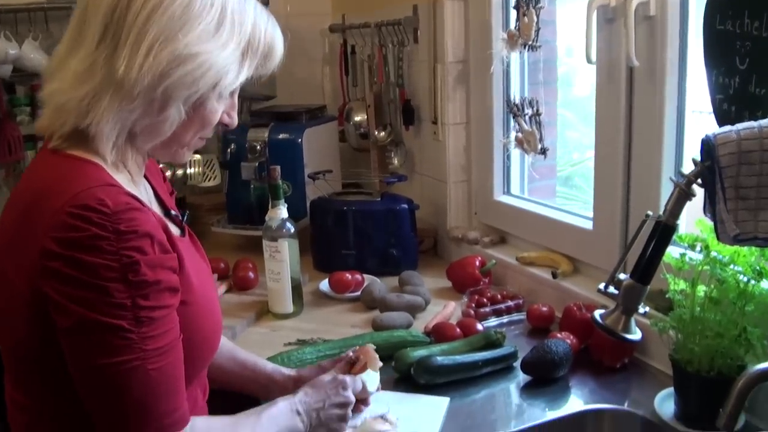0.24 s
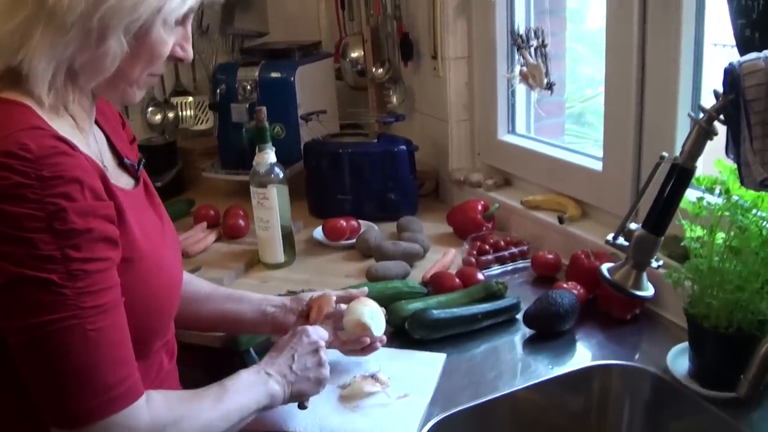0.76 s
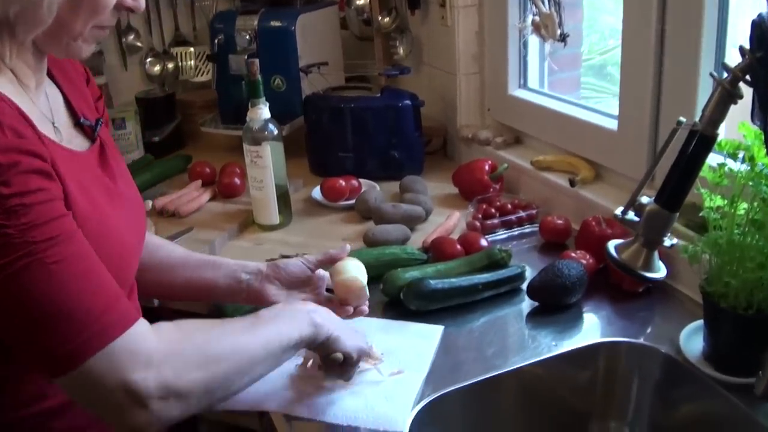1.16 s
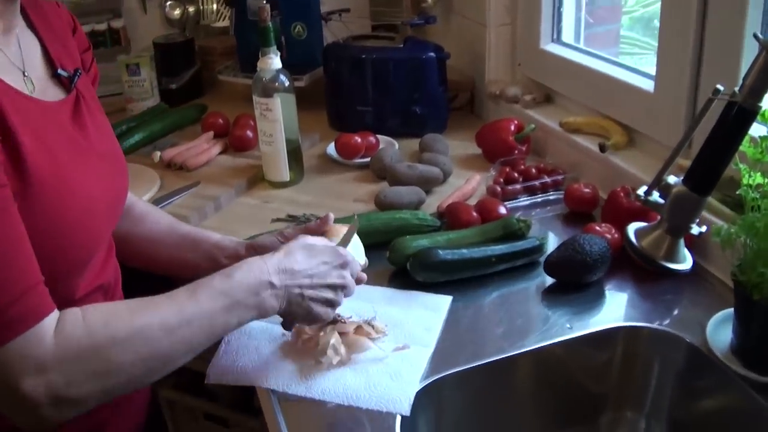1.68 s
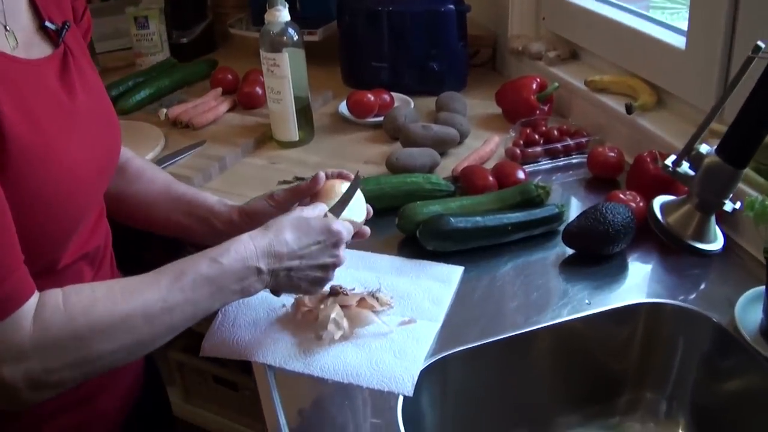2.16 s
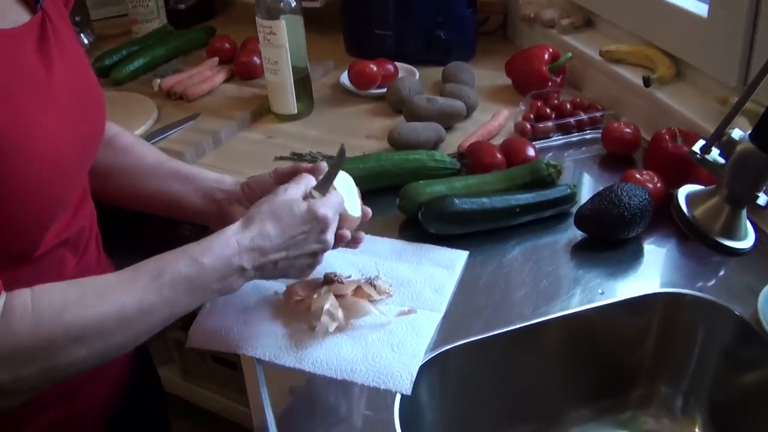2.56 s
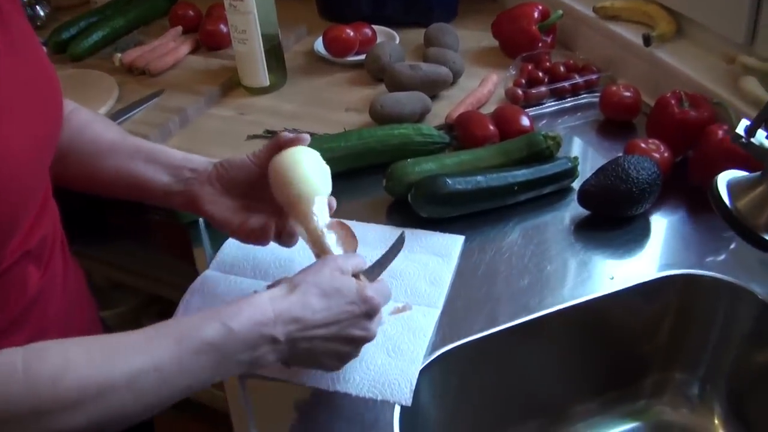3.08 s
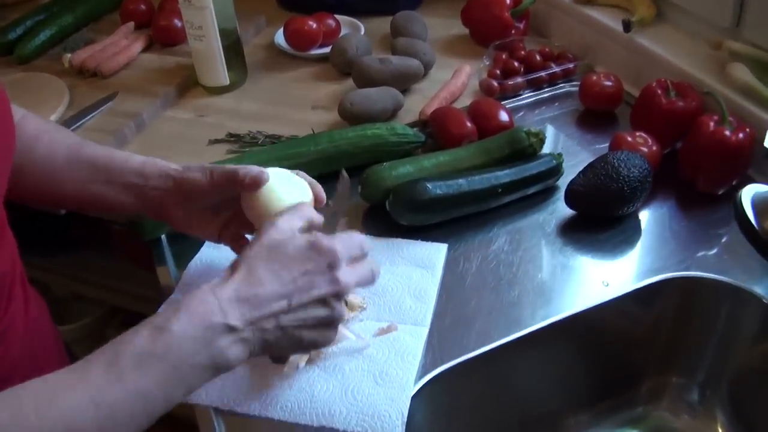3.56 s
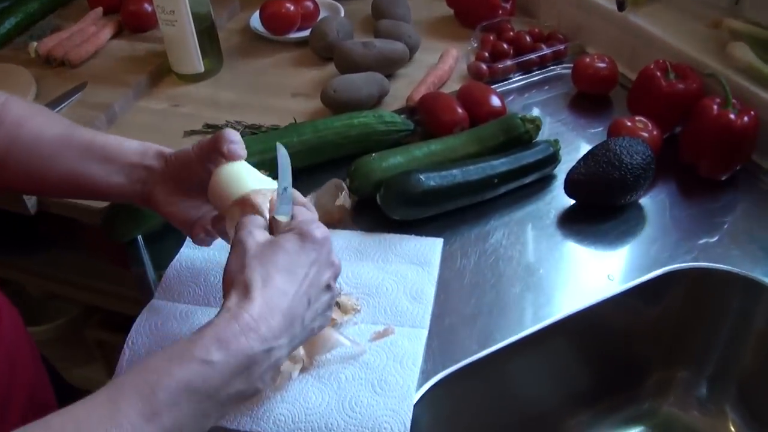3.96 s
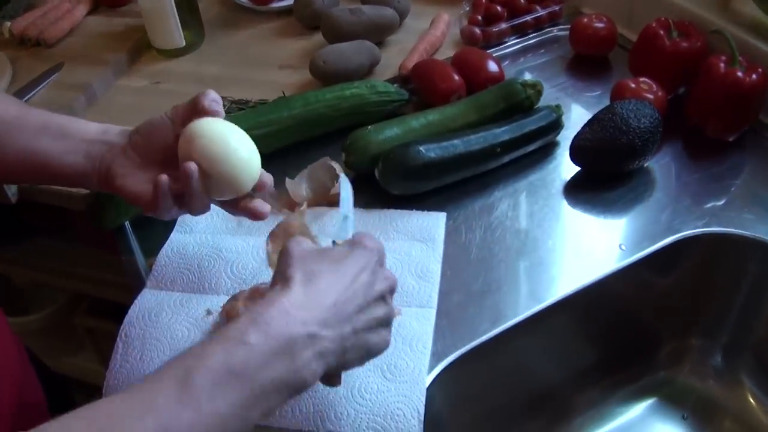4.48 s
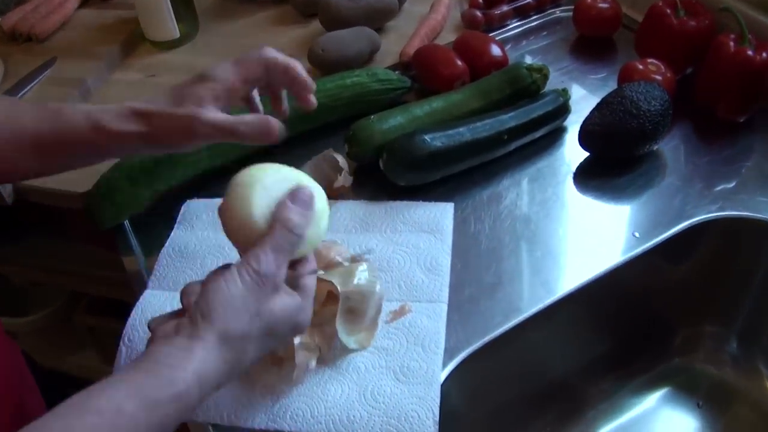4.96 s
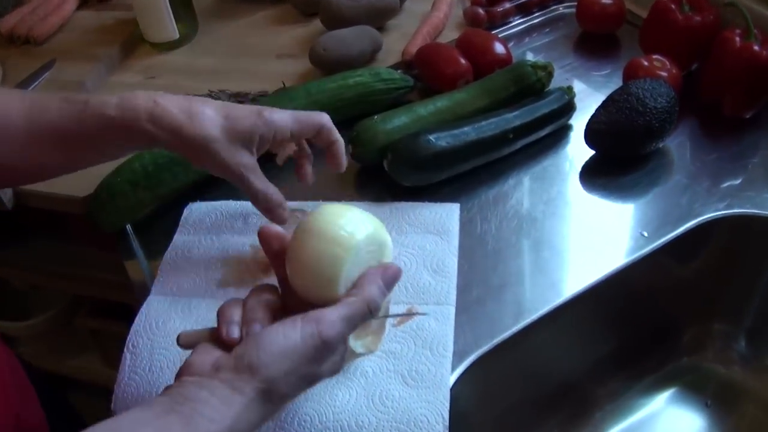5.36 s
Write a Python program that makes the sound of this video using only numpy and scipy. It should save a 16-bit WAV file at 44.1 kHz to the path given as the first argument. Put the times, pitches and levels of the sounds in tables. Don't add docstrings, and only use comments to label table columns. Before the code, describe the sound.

In a quiet small kitchen, one close microphone catches dry onion skin being peeled by hand and small knife. Dense snaps and papery rustling open, thin out to a near pause before two seconds, then return as brighter, longer rips. Sparse ticks and tugs follow; just after five seconds the onion bumps the counter dully and a last scrap rustles. Faint appliance hum and soft hiss lie beneath.

```python
import sys
import numpy as np
from scipy import signal
from scipy.fft import rfft, irfft
from scipy.io import wavfile
from scipy.ndimage import uniform_filter1d

SR = 44100
rng = np.random.default_rng(int(sys.argv[2]) if len(sys.argv) > 2 else 0)


def inscribe(sig):
    pcm = np.round(np.clip(np.atleast_2d(sig).T, -1, 1) * 32767)
    wavfile.write(sys.argv[1], SR, pcm.astype(np.int16))


def makeup_ratio(level_db):
    decades = np.asarray(level_db, float) / 20
    return 10 ** decades


N = 248091

# pitch_hz, density_db
ROOM_NOISE = [(12, -49), (20, -1.5), (54, -19), (103, -17), (196, -25), (266, -24), (333, -33), (811, -32),
              (1070, -36), (3450, -40), (4430, -42.5), (15500, -43)]
# pitch_hz, width_hz, level_db, start_s, end_s
APPLIANCE_HUM = [
    (264.6, 22, -67, -1.5, 1.57),
    (260, 54, -70.5, 3.5, 5.25),
    (500, 48, -68, 4, 5.15),
    (500, 77, -69.5, 0.3, 1.26),
    (717, 8.4, -86.5, 4.5, 7.1),
]
# pitch_hz, density_db
CHANNEL_HISS = [(12, -35), (20, 9.5), (282, -4.5), (416, -1.5), (667, -8.5), (15500, -6.5)]
# pitch_hz, t60_s
KITCHEN_DECAY = [(300, 0.11), (700, 0.24), (2000, 0.19), (6000, 0.052), (15000, 0.15)]
# delay_s, level_db
NEAR_ECHOES = [(.0036, -11.5), (.0071, -26), (0.01, -19), (0.017, -27)]
# start_s, blow_db
ONION_BLOWS = [
    (5.167, -27),
    (5.186, -32.5),
    (5.211, -31.5),
    (5.237, -37),
    (5.255, -38.5),
    (5.297, -44.5),
]
# pitch_hz, level_db, t60_s
COUNTER_MODES = [(102.6, -7, 0.17), (132, -0.5, 0.19), (183, 1, 0.17), (340, 0.5, 0.064), (419, 5, 0.077),
                 (462, -6.5, 0.25), (620, -5, 0.059), (775, -6.5, 0.069), (1160, -22, 0.061)]
# low_hz, high_hz, level_db
RUSTLE_BANDS = [
    (3260, 11900, -0.5),
    (7840, 17500, -1.5),
    (1280, 2426, 0.5),
    (470, 1130, -3),
]
# pitch_hz, width_hz, level_db over the rustle
SKIN_HOLLOWS = [(2150, 550, -8), (3300, 770, -1), (4520, 79, -3.5), (6400, 2500, -5.5)]
# start_s, end_s, pitch_hz, width_hz, lift (ratio, -1 shuts)
SKIN_CURLS = [(0.17, 0.237, 3660, 600, -0.2), (0.503, 0.575, 3200, 4600, -0.53),
              (1.224, 1.305, 2300, 500, 1), (2.198, 2.303, 2100, 500, 3), (2.2, 2.294, 5100, 900, 1.7),
              (2.204, 2.322, 6500, 3700, -1), (2.196, 2.3, 3240, 700, -0.3), (2.3, 2.35, 1800, 470, 3),
              (2.43, 2.534, 3020, 1400, -1.4), (2.46, 2.596, 4540, 630, 0.5),
              (2.665, 2.701, 12000, 3800, 2.4), (2.665, 2.7, 5200, 4500, -0.75),
              (2.756, 2.788, 2500, 580, 4.5), (2.967, 3.036, 2900, 620, 2.5), (3.228, 3.265, 3100, 350, 2),
              (3.377, 3.48, 2100, 330, 9), (3.354, 3.482, 3530, 400, 0.5), (3.34, 3.463, 8800, 3300, 0.3),
              (3.552, 3.713, 2320, 580, 1.7), (3.615, 3.698, 4500, 400, 0.5), (4.24, 4.398, 4400, 900, 0.8),
              (4.675, 4.708, 3600, 452, 7.5), (4.282, 4.4, 3100, 730, 0.5), (5.343, 5.385, 8700, 3600, 3),
              (5.338, 5.388, 3600, 3000, -3), (5.207, 5.295, 4300, 900, 0.1)]
# start_s, effort_db, fall_s per 20 dB, bright_db, body_db
HAND_JERKS = [(.003, -34.5, 0.1747, 2, -8), (.06, -41, 0.25, 3.5, -8), (.105, -43.5, 0.38, -7, -6),
              (.346, -39.5, 0.2163, 2, -10), (0.427, -44, 0.2342, 9, -3), (0.61, -36, 0.1934, 6, -7),
              (0.714, -46.5, 0.13, 2, -2), (0.978, -43.5, 0.15, 4, -13.5), (1.236, -49, 0.19, 3, -6),
              (2.207, -58, 0.6, 10, -8), (2.53, -49, 0.34, -10, -4), (2.313, -37.5, 0.09, 7, -11.5),
              (2.439, -48, 0.5, 8, -10), (2.548, -35, 0.43, -9, -10), (2.665, -38, 0.02, 17.5, -6),
              (2.744, -36, 0.068, 10.5, -13), (2.791, -35, 0.0726, 8, -5.5), (2.906, -39, 0.06, 6, 0),
              (2.917, -39, 0.03, 16.5, -13), (2.944, -31, 0.0548, 10, -3.5), (3.053, -65, 0.5, 3, -22),
              (3.227, -50.5, 0.21, 5, -15), (3.271, -44.5, 0.13, 7.5, -8.5), (3.34, -48, 0.07, 13.5, -18),
              (3.569, -53, 0.31, 4, -7), (4.239, -56.5, 0.18, 5, -13), (5.343, -52.5, 0.06, 5.5, -20.5),
              (5.56, -66.5, -1.5, 5.5, -6.5)]
# peak_s, effort_db, swell_s per 20 dB, bright_db, body_db
FINGER_SLIDES = [(0.195, -32.5, 0.085, 6.5, -10.5), (.29, -44.5, 0.2, -3, -4), (.5, -50, 0.27, -4, -1),
                 (.85, -57.5, 0.12, -11, -1.5), (1.085, -46, 0.1151, -14, -4.5), (1.32, -50.5, 0.32, 3, -7),
                 (2.708, -39.5, 0.19, 6.5, -9), (2.89, -47, 0.1862, 6, -2), (3.133, -45.5, 0.2136, 4.5, -6),
                 (3.669, -48, 0.08, 10, -8.5), (3.88, -59, 0.37, -11, -5), (4.0, -58.5, 0.33, 3, -12.5),
                 (4.325, -50.5, 0.1, 3.5, -8), (4.369, -44.5, 0.0821, 1, -2.5), (4.602, -47, 0.0767, 5, -7),
                 (4.85, -71, 1, -8, 1.5), (5.233, -45, 0.0639, 0.5, -9.5), (5.42, -59.5, 0.06, 3, -5.5)]
# start_s, peak_db, pitch_hz
PINPRICKS = [(.1986, -17, 8000), (.3237, -31, 7000), (.4535, -37, 2000), (2.2218, -40, 2000),
             (2.2272, -35, 5500), (2.2444, -44, 2000), (2.2652, -35, 5000), (2.3203, -30, 1860),
             (2.508, -33, 3300), (2.5718, -17, 4500), (2.9176, -16, 6000), (3.1256, -31, 6000),
             (3.1417, -26, 10100), (3.158, -30, 5000), (3.1636, -31, 8050), (4.2806, -37.5, 10000),
             (4.6882, -43, 3600), (2.495, -41, 1700), (2.432, -43, 1800), (5.5713, -44.5, 3700)]
# start_s, peak_db, pitch_hz, bright_db
SCATTERED_TICKS = [(1.3, -49, 1670, 0), (.889, -42, 3700, 3), (0.99, -20, 7000, -8), (3.2, -36, 9500, -3),
                   (1.4113, -34, 6700, -1), (4.3, -37, 4430, -10), (3.881, -37, 4300, -8),
                   (3.154, -32, 5200, 0), (4.8915, -55, 11500, -2), (4.9305, -49, 5000, -12),
                   (4.0735, -34.5, 4000, -5), (3.138, -25, 4500, -3), (4.2665, -36, 7200, 2.5),
                   (4.286, -39, 4300, -8), (4.3505, -29, 4200, -3), (4.3765, -25, 5500, -3),
                   (4.383, -32, 7000, -2), (4.391, -35, 1860, -2), (4.5785, -35.5, 2480, -7),
                   (3.1165, -34, 6200, 2), (2.5488, -22, 7100, -8), (.6035, -25.5, 9400, -3),
                   (0.0031, -17.5, 3600, -7)]
# start_s, peak_db, pitch_hz (ring), push_db (low), bright_db (crack)
CLEAN_TICKS = [(.0954, -18.5, 6130, -32, 3), (.2269, -13, 6000, -17, -15), (.2867, -12.5, 4900, -20, -8),
               (.3455, -14, 4760, -4.5, 0), (.4279, -15.5, 3690, -8, 0.5), (.4993, -21, 3570, -22, 5.5),
               (.5946, -13.5, 5500, -21, -25), (.6749, -22.5, 2100, -23, 0),
               (.977, -8.5, 5070, -19.5, -11.5), (1.0475, -31.5, 4500, -2, 2),
               (1.285, -28.5, 7100, -8, -10), (2.1961, -47, 5500, -15, -3), (2.212, -42, 5210, -42.5, -2),
               (2.2652, -34, 1946, -24, 6.5), (2.4687, -31, 6200, -29, -10), (2.621, -22, 6600, -17, -10),
               (2.7904, -6, 6070, -14.5, -20), (2.8956, -14, 6000, -6.5, 0), (3.1972, -33, 7043, -33, -11),
               (3.8067, -35.5, 4520, -21, -12), (3.9541, -47, 4100, -16, -2.5),
               (4.1076, -36.5, 7150, -19, -10), (5.2998, -36, 1950, -23, -7),
               (5.3981, -28.5, 4740, -11, -15)]
FURTHER_CREASES = [(.0625, -42, 3600, -28, -1), (.1107, -18.5, 12100, -26, 0), (.1432, -22, 8000, -30, 1),
                   (.353, -25, 4000, -22, -6), (.3635, -33, 7000, 2, 12), (.415, -30, 4550, -25, -1),
                   (.436, -27.5, 12500, -13, 0), (2.2058, -36, 5170, -29, 3), (2.229, -32, 12500, -30, -1),
                   (2.232, -33, 4900, -30, 4), (2.3145, -21.5, 12400, -25, -1), (2.342, -29, 6200, -32, -10),
                   (2.362, -34, 6100, -34, -10), (2.386, -29.5, 6260, -28, 1), (2.448, -46.5, 1900, -20, 3),
                   (2.484, -30, 4500, -30, -1), (2.5315, -28, 4600, -29.5, -6),
                   (2.535, -31.5, 4500, -32, -10), (2.6675, -14, 12000, -18, 2),
                   (2.6705, -17, 11000, -27, -8), (2.685, -14.5, 11500, -31, -10),
                   (2.692, -16, 11100, -35, -9), (2.7005, -26, 1780, -18, -4),
                   (2.7415, -20.5, 3400, -12.5, -8), (2.7475, -23.5, 4470, -17, 3.5),
                   (2.762, -20, 3300, -36, -12), (2.7715, -23, 7000, -27, -8), (2.805, -18, 9300, -37, -2.5),
                   (2.881, -24, 6500, -28, -8), (2.949, -19, 1670, 1, -12), (3.001, -24, 8000, -6, -5),
                   (3.038, -45, 12000, -30, -3), (3.352, -30, 7200, -33, 0.5), (3.551, -52.5, 12000, -30, -2),
                   (3.5595, -37, 10300, -29.5, -9), (3.6225, -35, 4540, -30, -8),
                   (5.1955, -33, 4500, -25, -7.5), (5.168, -52, 2190, -5, -15), (5.3005, -44, 3900, -25, -10),
                   (3.497, -46, 5040, -27, -10)]
SNAPS_EARLY = [(.0349, -23, 3500, -31, -7), (.0593, -13, 3700, -11.5, 0.5),
               (.1045, -19.5, 4570, -14, -5), (.1074, -14.5, 8300, -11, -2),
               (.1498, -27, 3530, -2, 3), (.1727, -13.5, 5040, -7.5, -10),
               (.1775, -11, 6370, -32, -0.5), (.3062, -18, 6800, -9, -12),
               (.3552, -30.5, 9000, 4, 14), (.3718, -17.5, 6150, -12.5, -5),
               (.4678, -17, 6500, -12.5, 1), (.612, -18.5, 6350, -22, 9),
               (.655, -21.5, 10100, -8.5, 7), (1.2271, -31, 3430, -34, -4),
               (1.2386, -22, 3740, -37, -11), (1.3597, -31, 7250, -35, -8),
               (1.8179, -39.5, 1800, -4, 4.5), (2.221, -31.5, 4970, -33, 1.5),
               (2.2442, -35, 5040, -30.5, 5), (2.2742, -32.5, 1970, -12, 6),
               (2.3236, -16, 5300, -13.5, -4), (2.4354, -17.5, 5900, -39.5, -17),
               (2.4919, -24, 4460, -29, -10.5)]
SNAPS_LATE = [(2.5445, -18, 4680, -36, 0), (2.555, -18.5, 4070, -35, -21),
              (2.5815, -16, 4550, -20, -1), (2.5906, -18, 4670, -23, -14),
              (2.6002, -13.5, 5860, -36, -8), (2.6345, -18.5, 6890, -11, -3),
              (2.6995, -21, 5230, -27, -4), (2.8114, -17, 3300, -32, -14),
              (2.8226, -18.5, 6640, -30, -1.5), (2.8883, -20, 9910, -37, -9),
              (3.0854, -24, 6400, -27, -9), (3.1331, -21.5, 8200, -28, -8),
              (3.1713, -31, 9990, -11, 8.5), (3.3904, -36.5, 10000, -22, 8),
              (3.5697, -35.5, 3300, -30, 9), (3.5885, -35, 4600, -11, -5),
              (4.3265, -24.5, 4320, -23, -12), (4.604, -24, 7100, -19, -0.5),
              (5.1954, -32.5, 1710, -8, -11.5), (5.2277, -23, 4420, -16, 1.5),
              (5.3406, -23.5, 6840, -7.5, -1), (5.3875, -41, 1900, -9, -15)]
RIPS_FIRST_STRIP = [(.0118, -19, 3686, -11, -7), (.0197, -17, 3520, -24, -20), (.0308, -23, 5160, -31, 3),
                    (.1593, -18.5, 3470, -12, -7), (.1872, -13, 3862, -11, -18),
                    (.2063, -20.5, 9773, -9, 2), (.2145, -9, 7560, -10.5, -7), (.2218, -15.5, 3500, -30, 3),
                    (.2605, -25, 4894, -32, -19), (.2705, -16, 5500, -31.5, -10),
                    (.2986, -18, 4860, -27, -8), (.3115, -25.5, 6550, -4.5, 8),
                    (.3792, -14, 7100, -13.5, -3), (.4581, -12.5, 7000, -11.5, -6),
                    (.607, -15, 8400, -15.5, -7), (.6503, -23, 3470, -27, -13), (.7137, -25, 2220, -4, 4),
                    (.7562, -26.5, 2300, -20, -5), (.9702, -20, 7350, -12.5, -6),
                    (1.0772, -29.5, 3570, -2.5, 2.5), (1.941, -37, 7960, -12, -10)]
RIPS_LATER_STRIPS = [(2.1413, -55, 1860, -16, 10.5), (2.3093, -25, 7700, -2.5, -4),
                     (2.5606, -13, 4520, -37, -12), (2.649, -15.5, 5760, -17, -7.5),
                     (2.6635, -13, 5800, -6.5, -5), (2.665, -12, 10300, -23.5, -2),
                     (2.7378, -14, 6150, -20, -8), (2.7436, -12, 3750, -6, -3),
                     (2.9057, -13.5, 5440, -14, -8.5), (2.9167, -12.5, 6000, -10.5, -1),
                     (2.9434, -6.5, 8560, -39, -12), (2.9482, -14.5, 5550, -3, -2),
                     (3.0536, -24.5, 8700, -10, 2.5), (3.0998, -26, 5600, -12, 1),
                     (3.2267, -22, 3220, -31, -3), (3.2703, -22.5, 7500, -36, -1),
                     (3.2811, -19, 9500, -42, -9), (3.2913, -26, 2150, -13, 4),
                     (3.3398, -24.5, 3500, -2.5, 8), (3.646, -32, 3370, -26.5, -15),
                     (4.362, -24.5, 1990, -16, -1.5), (5.4097, -41.5, 4246, -22, -11),
                     (5.5573, -51.5, 3850, -21, 0), (5.5774, -45, 3600, -8, 6)]

TICK_SPRAY_DB, SNAP_SPRAY_DB, RIP_SPRAY_DB = -21, -17.5, -12
FAINT_PUSH_DB = -18


def evened(x):
    return x / np.sqrt(np.mean(x ** 2) + 1e-20)


def read(points, hz):
    f, value = np.transpose(points)
    return np.interp(np.log(hz + 1), np.log(f + 1), value)


def coloured(x, points):
    return irfft(rfft(x) * makeup_ratio(read(points, np.fft.rfftfreq(N, 1 / SR))), N)


def add(mix, s, sound):
    part = mix[max(round(s * SR), 0):][:len(sound)]
    part += sound[:len(part)]


def band(x, lo_hz, hi_hz, order=2):
    edges = [lo_hz, min(hi_hz, SR / 2.1)]
    return signal.sosfilt(signal.butter(order, edges, "band", fs=SR, output="sos"), x)


def around(x, hz, width):
    return band(x, hz - width / 2, hz + width / 2, order=1)


def slow(size):
    once = uniform_filter1d(rng.standard_normal(N), size)
    return evened(uniform_filter1d(once, size))


def channel_hiss():
    return makeup_ratio(-72.5) * evened(coloured(rng.standard_normal(N), CHANNEL_HISS))


def background():
    t = np.arange(N) / SR
    noise = evened(coloured(rng.standard_normal(N), ROOM_NOISE))
    out = makeup_ratio(-57) * noise * makeup_ratio(0.5 * slow(size=6000))
    for hz, width, db, start, end in APPLIANCE_HUM:
        running = np.interp(t, [start - 0.2, start, end, end + 0.23], [0.091, 1.0, 1.0, 0.11])
        waver = makeup_ratio(db + 1.1 * slow(size=5000))
        out += running * waver * evened(around(rng.standard_normal(N), hz, width))
    return out


def room(x):
    out = np.zeros(N)
    turn = np.arange(N) / SR * 8.99
    for window in (np.sin(turn), np.cos(turn)):
        taps = np.zeros(SR // 2)
        at = np.arange(200, len(taps) - 20, 20)
        taps[at + rng.integers(0, 20, len(at))] = rng.choice([-1., 1.], len(at))
        hz, t, z = signal.stft(taps, SR, nperseg=256)
        decay = makeup_ratio(-60 * t / read(KITCHEN_DECAY, hz)[:, None])
        tail = signal.istft(z * decay, SR, nperseg=256)[1]
        out += signal.oaconvolve(x * window, tail / np.linalg.norm(tail))[:N]
    return makeup_ratio(-12) * out


def bump():
    t = np.arange(SR // 2) / SR
    out = np.zeros(N)
    spots = rng.uniform(-0.57, 1, (len(ONION_BLOWS), len(COUNTER_MODES)))
    for (s, blow_db), spot in zip(ONION_BLOWS, spots):
        ring = np.zeros(len(t))
        for (hz, db, t60), u in zip(COUNTER_MODES, spot):
            ring += makeup_ratio(db + 9.5 * u - 60 * t / t60) * np.sin(2 * np.pi * hz * t)
        scuff = makeup_ratio(-4.5 - 60 * t / 0.21) * evened(band(rng.standard_normal(len(t)), 210, 1040))
        soft_onset = 1 - np.exp(-t / 0.0024)
        add(out, s, makeup_ratio(blow_db - 11.5) * (scuff - ring) * soft_onset)
    return out


def strokes():
    t = np.arange(N) / SR
    power = np.full((3, N), 1e-10)
    rows = [(0.0059, *row) for row in HAND_JERKS]  # rise, s per 20 dB
    rows += [(row[2], *row) for row in FINGER_SLIDES]
    for rise, s, effort_db, fall, bright_db, body_db in rows:
        swell = makeup_ratio(effort_db - 20 * np.maximum((s - t) / abs(rise), (t - s) / abs(fall)))
        power += (swell * makeup_ratio(np.array([[0], [bright_db], [body_db]]))) ** 2
    return 10 * np.log10(power)


def rustle():
    effort_db, bright_db, body_db = strokes()
    out = np.zeros(N)
    sizes = makeup_ratio(3.5 * np.minimum(rng.exponential(1, N), 1.25)) * rng.standard_normal(N)
    clicks = evened(sizes * (rng.random(N) < 4000 / SR))
    rubbing = 1.25 * rng.standard_normal(N)
    cracks = (clicks + rubbing) * makeup_ratio(1.4 * slow(size=150))
    for (lo, hi, band_db), level_db in zip(RUSTLE_BANDS, [effort_db, bright_db, body_db, body_db]):
        patchy = makeup_ratio(2.37 * slow(size=400))
        out += evened(band(cracks, lo, hi) * patchy) * makeup_ratio(band_db + level_db)
    for hz, width, db in SKIN_HOLLOWS:
        opening = makeup_ratio(db + 6.4 * np.tanh(slow(size=1500)))
        out += opening * around(out, hz, width)
    for start, end, hz, width, lift in SKIN_CURLS:
        part = out[max(round(start * SR), 0):round(end * SR)]
        eased = signal.windows.tukey(len(part), 0.3)
        add(out, start, max(lift, -1) * eased * around(part, hz, width))
    return out


def snap(peak_db, hz, low_db, bright_db, spray_db, noise):
    t = np.arange(len(noise)) / SR
    rise = t / (0.00015 + 1.0 / hz)
    ring = np.sin(2 * np.pi * hz * t) * rise * np.exp(1 - rise)
    wide = band(noise * np.exp(-t / 0.00045), 0.45 * hz, 9000)
    crack = band(noise * t * np.exp(-t / 0.0005), 9000, 16000)
    push = -band(t == 0, 61, 1460, order=1)
    wide_db = -4 - 8 * (hz < 2600)
    layers = [(ring, -4), (wide, wide_db), (crack, bright_db), (push, low_db + 6)]
    direct = sum(makeup_ratio(db) * layer / abs(layer).max() for layer, db in layers)

    echoes = np.zeros(len(t))
    for (delay, db), u in zip(NEAR_ECHOES, noise[-40:].reshape(4, 10)):
        add(echoes, delay * (1 + 0.056 * u[0]), makeup_ratio(db) * 0.23 * u)
    reflected = np.convolve(direct[:200], echoes)[:len(t)]

    grit = noise[::-1] * abs(noise)
    loose = band(grit, min(0.61 * hz, 6000), 9400)
    loose += makeup_ratio(0.5 * bright_db + 6.5) * band(grit, 11000, 12600)
    loose += 0.17 * evened(band(grit, hz, 1.265 * hz))
    spray = loose * np.exp(-t / 0.0094) * (1 - np.exp(-t / 0.00022))
    return makeup_ratio(peak_db) * (direct + reflected + makeup_ratio(spray_db) * spray)


def pins():
    out = np.zeros(N)
    for (s, peak_db, hz), noise in zip(PINPRICKS, rng.standard_normal((len(PINPRICKS), 1500))):
        add(out, s, snap(peak_db, hz, FAINT_PUSH_DB, -9, TICK_SPRAY_DB, noise))
    return out


def snaps():
    faint = [(s, db, hz, FAINT_PUSH_DB, bright_db) for s, db, hz, bright_db in SCATTERED_TICKS]
    kinds = [(CLEAN_TICKS, TICK_SPRAY_DB), (FURTHER_CREASES, TICK_SPRAY_DB), (faint, TICK_SPRAY_DB),
             (SNAPS_EARLY, SNAP_SPRAY_DB), (SNAPS_LATE, SNAP_SPRAY_DB),
             (RIPS_FIRST_STRIP, RIP_SPRAY_DB), (RIPS_LATER_STRIPS, RIP_SPRAY_DB)]
    rows = [(*row, spray_db) for table, spray_db in kinds for row in table]
    out = np.zeros(N)
    for (s, *row), noise in zip(rows, rng.standard_normal((len(rows), 1500))):
        add(out, s - 0.0001, snap(*row, noise))
    return out


def scene():
    skin = rustle() + snaps()
    mid = background() + room(skin) + bump() + skin + pins()
    side = channel_hiss()
    return np.array([mid + side, mid - side])


def low_pass(x):
    return signal.sosfilt(signal.butter(12, 16810, fs=SR, output="sos"), x)


def record(dry):
    step = np.array([band(channel ** 2, 21, 81) for channel in dry])
    bent = dry + 0.83 * step
    lowpass = signal.firwin(255, 16000, window=("kaiser", 6), fs=SR)
    limited = signal.oaconvolve(bent, lowpass[None], "same")
    return low_pass(limited)


dry = scene()
out = record(dry)
inscribe(out)
```